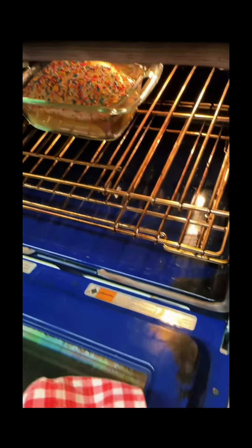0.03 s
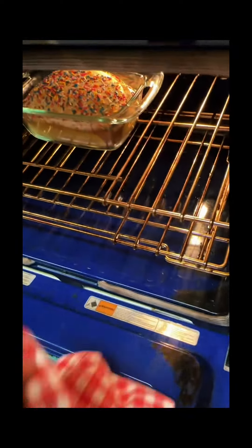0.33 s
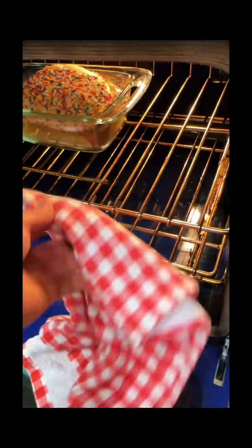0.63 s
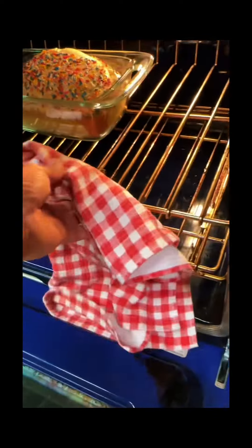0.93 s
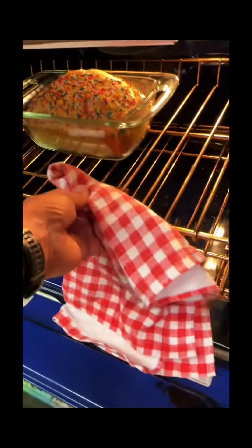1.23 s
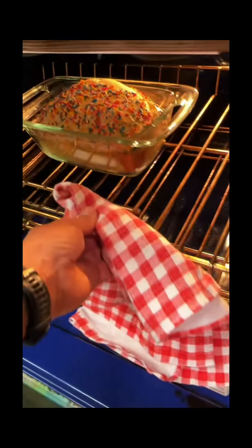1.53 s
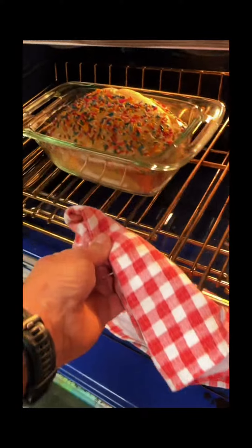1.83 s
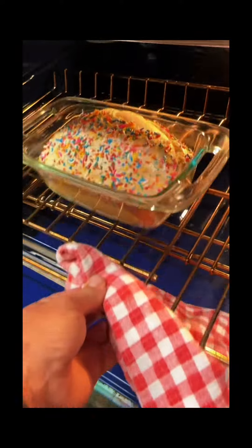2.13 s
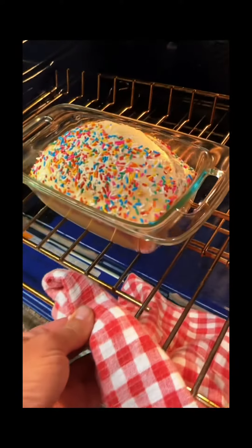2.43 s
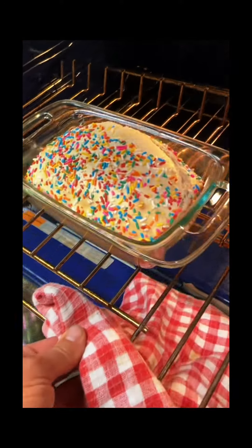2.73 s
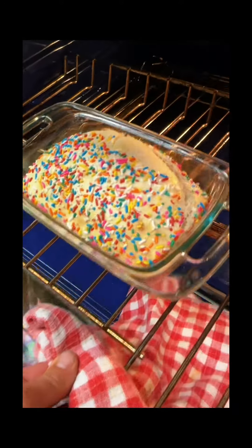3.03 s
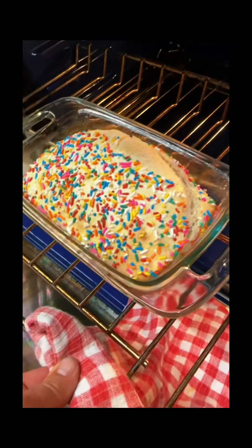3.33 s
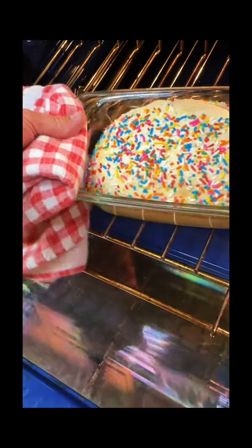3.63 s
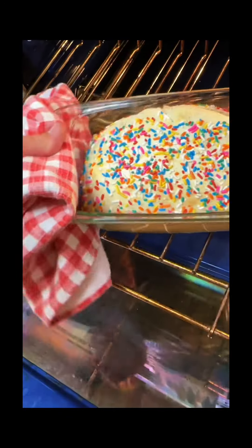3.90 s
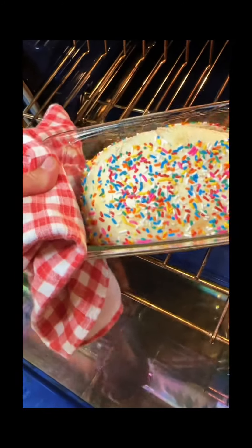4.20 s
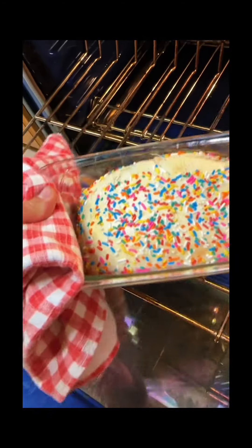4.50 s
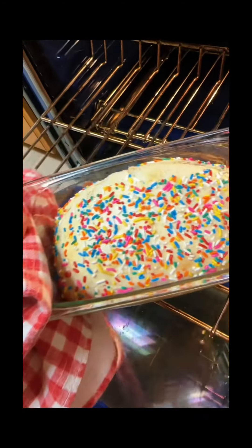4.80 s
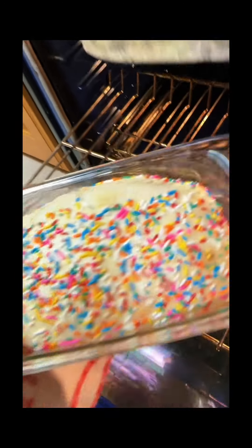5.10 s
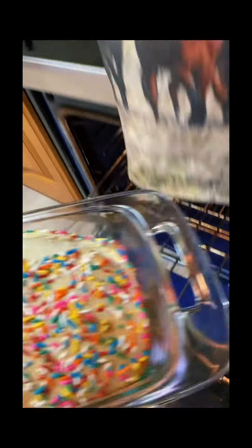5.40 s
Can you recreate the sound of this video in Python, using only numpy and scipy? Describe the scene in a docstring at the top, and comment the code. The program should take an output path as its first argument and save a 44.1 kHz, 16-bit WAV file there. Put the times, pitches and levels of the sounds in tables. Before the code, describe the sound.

Close to an open oven in a kitchen, a low electrical hum and blowing fan run throughout. After a few light scuffs, the metal rack slides out with a rolling scrape, knocks several times and hits its stop with a ringing clank and thud. A click and a tiny gap follow. Then a glass pan clinks and rattles off the rack, and faint cloth rustling accompanies it as it is carried away.

```python
"""An open oven hums and its fan blows while a wire rack with a glass loaf pan is drawn out with a cloth.
The rack grinds and rumbles along its runners, bumps over a catch, clanks against its stop and rattles
as the pan is lifted. The hum is mains harmonics; air, friction and cloth are shaped noise; knocks are
damped modes, wire buzz and wall thuds. The steel cavity and the kitchen answer.
Once the sound cuts out for a moment with a click."""
import sys
import numpy as np
from scipy import signal
from scipy.fft import rfft, irfft, next_fast_len
from scipy.io import wavfile
from scipy.ndimage import map_coordinates

SR = 44100
rng = np.random.default_rng(int(sys.argv[2]) if len(sys.argv) > 2 else 0)


def to_wav(sig):
    """Store sig (one row per channel, or 1-D mono) as 16-bit WAV at the path in sys.argv[1].

    Samples outside -1..1 are clipped; the rate is SR.
    """
    pcm = np.clip(np.atleast_2d(sig), -1, 1) * 32767
    pcm = np.round(pcm).astype(np.int16)
    wavfile.write(sys.argv[1], SR, pcm.T)  # frames by channels


N = 244789
TIME_S = np.arange(N) / SR
CUT_S = 3.387


def amp(db):
    """dB to gain."""
    return 10 ** (np.asarray(db) / 20)


def unit(x):
    """Scale to rms 1."""
    return x / np.sqrt(np.mean(x ** 2) + 1e-20)


def along(points, hz):
    """Interpolate (f/Hz, value) rows on a log axis."""
    f, values = np.transpose(points)
    return np.interp(np.log(hz + 1), np.log(f + 1), values)


def wobble(rate_hz):
    """Smooth random curve, rate_hz knots a second."""
    knots = rng.standard_normal(int(N * rate_hz / SR) + 4)
    return map_coordinates(knots, [np.arange(N) * rate_hz / SR])


def filtered(x, response):
    """Apply the gain response(hz)."""
    n = x.shape[-1]
    size = next_fast_len(n + 8192)
    return irfft(rfft(x, size) * response(np.fft.rfftfreq(size, 1 / SR)), size)[..., :n]


def add(track, at_s, sound):
    """Mix a sound into the track."""
    part = track[:, round(at_s * SR):][:, :sound.shape[-1]]
    part += sound[:, :part.shape[-1]]


def noise(spectrum, size=N):
    """Noise pair of rms 1, shaped by (f/Hz, relative level/dB) rows."""
    white = rng.standard_normal((2, size))
    return unit(filtered(white, lambda hz: amp(along(spectrum, hz))))


def dying(x, t60s):
    """Fade each band by (f/Hz, t60/s) rows."""
    hz, t, bands = signal.stft(x, SR, nperseg=256)
    decay = amp(-60 * t / along(t60s, hz)[:, None])
    return signal.istft(bands * decay, SR, nperseg=256)[1][:, :x.shape[-1]]


def resonances(peaks, hz):
    """Gain of (f/Hz, width/Hz, lift/dB) peaks on a flat response."""
    return amp(sum(db / (1 + (2 * (hz - centre) / width) ** 2) for centre, width, db in peaks))


def cavity(x, ripple_db, spacing_hz=45):
    """Standing waves in the steel box lift and sink narrow bands per channel; output rms 1."""
    knots = rng.standard_normal((2, SR // 20))

    def response(hz):
        ripple = np.array([map_coordinates(k, [hz / spacing_hz], mode="mirror") for k in knots])
        return amp(ripple_db * ripple * hz / (hz + 600))
    return unit(filtered(x, response))


def kitchen(x, low_cut_hz=220):
    """The room's diffuse tail, 10 ms late."""
    t60s = [(150, 0.094), (1000, 0.28), (6000, 0.43)]  # room decay: f/Hz, t60/s
    tail = dying(rng.standard_normal((2, SR // 2)), t60s)
    tail = np.pad(tail / np.linalg.norm(tail[0]), ((0, 0), (SR // 100, 0)))
    reverb = signal.fftconvolve(x, tail, axes=1)[:, :N]
    return filtered(reverb, lambda hz: hz ** 2 / (hz ** 2 + low_cut_hz ** 2))


def nearness_db():
    """Level change as the microphone nears and leaves the oven's mouth."""
    path = [(0, -0.5), (.6, -0.5), (1.7, 1.5), (2.75, -2), (3.3, 1), (3.8, 2), (4.3, 1), (4.95, 0),
            (5.55, -1.5)]  # t/s, level/dB
    return np.interp(TIME_S, *np.transpose(path))


def hum(hum_hz=120, lead_s=0.00016, waver_db=0.6):
    """The fan motor buzzes at twice the mains rate, left port first; its overtones waver."""
    harmonics = [(1, 1.5), (2, -22.5), (3, -22.5), (4, -41.5), (5, -44.5), (6, -49.5)]  # order, relative level/dB
    near_db = nearness_db()
    phase = 2 * np.pi * hum_hz * (TIME_S - CUT_S + np.array([[.5], [-.5]]) * lead_s)
    tone = -amp(harmonics[0][1]) * np.cos(phase)
    for order, db in harmonics[1:]:
        octave_db = 0.33 + near_db if order == 2 else 0
        tone += amp(db + octave_db + wobble(3.9)) * np.sin(order * phase + 0.34 * wobble(9.1))
    return np.sqrt(2) * amp(-29 + 0.8 * near_db + waver_db * wobble(8.3)) * tone


def fan(rumble_db=-38.5, rush_db=-58.5, hiss_db=-64, hiss_fall_db_per_s=0.66):
    """Moving air: cavity rumble, vent rush and a slowly fading hiss, all through the duct."""
    # air spectra: f/Hz, level/dB
    rumble_shape = [(20, -24.5), (40, 0), (60, 3), (100, 9.5), (145, 3), (180, -7), (230, -3), (270, -5),
                    (310, -9), (380, -12), (450, -11), (520, -29), (800, -63)]
    rush_shape = [(300, -28), (480, 1.5), (620, 0.5), (720, -0.5), (830, 0), (1100, -4.5), (1450, -7),
                  (1800, -11.5), (2250, -15.5), (2700, -34), (5000, -52.5)]
    hiss_shape = [(1200, -27.5), (2100, 7.5), (2700, 5), (3200, 2.5), (4200, 2), (4800, 0), (5400, -9),
                  (6100, -13), (7000, -32), (8000, -38)]
    duct = [(453, 18, 2), (563, 100, 5), (1090, 30, 6.5), (1330, 150, 4.5), (1380, 130, 0), (1980, 78, 2.5),
            (2150, 110, 3.5), (2750, 300, 0), (4070, 52, 6.5), (5700, 700, 2)]  # duct and cavity resonances: f/Hz, width/Hz, lift/dB
    near_db = nearness_db()
    flutter_db = .6 * wobble(10)
    rumble = amp(rumble_db + 0.87 * near_db + 0.81 * wobble(6.2)) * noise(rumble_shape)
    rush = amp(rush_db + 0.97 * near_db + flutter_db) * cavity(noise(rush_shape), ripple_db=3)
    hiss_gain = amp(hiss_db + 0.43 * near_db - hiss_fall_db_per_s * TIME_S)
    hiss = hiss_gain * cavity(noise(hiss_shape), ripple_db=2.2)
    return filtered(rumble + rush + hiss, lambda hz: resonances(duct, hz))


def draught(level_db=-47, fall_db_per_s=8, gust_db=3, gust_s=.25):
    """Air from the open door starts with a gust and dies away."""
    spectrum = [(200, -7), (350, 10.5), (450, 5.5), (530, -3.5), (630, 5), (780, -3.5), (1050, -3),
                (1250, -6.5), (1420, 0.5), (1650, -6), (1850, -13.5), (2200, -15.5), (2800, -41)]  # broad rush: f/Hz, level/dB
    gust = np.exp(-TIME_S / gust_s)
    return amp(level_db - fall_db_per_s * TIME_S + gust_db * gust) * noise(spectrum)


def cloth(start_s=3.8, rise_s=.2, level_db=-68, clump_db=4, grain_db=3.5):
    """The cloth rustles in uneven clumps while the pan is carried."""
    spectrum = [(500, -20.5), (1200, -1.5), (2200, 0.5), (3000, -4), (4000, -3.5), (5000, -10.5),
                (7000, -26.5)]  # rustle: f/Hz, level/dB
    grip = np.clip((TIME_S - start_s) / rise_s, 0, 1)
    creases = amp(clump_db * wobble(16) + grain_db * wobble(220))
    return amp(level_db) * grip * unit(creases * cavity(noise(spectrum), ripple_db=4))


def scuffs_and_tick(min_width_oct=0.14, click_s=.0018):
    """Light scuffs, and one sharp tick as the treble briefly dips: band noise, broader when briefer."""
    bursts = [(0.328, -68, 5400, 0.026), (.945, -63.5, 3830, 0.031), (1.046, -54.5, 4100, .0015),
              (1.157, -66.5, 5700, 0.01), (2.958, -68.5, 5400, 0.02), (4.046, -71, 4570, 0.019),
              (4.233, -58, 2200, 0.023), (4.649, -70, 5390, 0.028), (5.03, -63.5, 3500, 0.029)]  # t/s, level/dB, f/Hz, length/s
    track, t = np.zeros((2, N)), np.arange(SR // 4) / SR
    for at_s, db, centre_hz, length_s in bursts:
        width_oct = min_width_oct + click_s / length_s
        band = lambda hz: 1 / (1 + (np.log2((hz + 1) / centre_hz) / width_oct) ** 2)
        burst = unit(filtered(rng.standard_normal((2, len(t))), band))
        age = 2 * t / length_s
        add(track, at_s, amp(db) * age * np.exp(1 - age) * burst)
    return track


def rack_speed(start_s=1.2, rise_s=0.16, ease_s=2.28, ease_db_per_s=4.5, stop_s=3.09, halt_s=.04):
    """One pull, 0 to 1: the rack gathers speed, runs, eases off and meets the stop."""
    gather = np.clip((TIME_S - start_s) / rise_s, 0, 1)
    ease = amp(-ease_db_per_s * np.maximum(TIME_S - ease_s, 0))
    halt = np.clip(1 - (TIME_S - stop_s) / halt_s, 0, 1)
    return gather * ease * halt


def runners(friction_db=-57, rolling_db=-42):
    """The runners grind in tiny catches that make them sing; the rolling rack shakes the walls."""
    # friction and rolling spectra: f/Hz, level/dB
    friction_shape = [(300, -16), (600, 4.5), (850, 1), (1150, 7), (1700, 4.5), (2150, -2.5), (2800, -1),
                      (4000, -6), (5000, -9), (5900, -14.5), (7000, -36.5)]
    rolling_shape = [(30, -22.5), (70, 7), (140, 8.5), (230, -3.5), (340, 5.5), (450, -9.5), (800, -44)]
    singing = [(365, 70, 15), (596, 84, 10.5), (690, 100, 7), (950, 84, 3.5), (1122, 58, 9.5),
               (1983, 110, 7.5), (2200, 130, 10), (4000, 150, 6.5), (5800, 900, 5)]  # runner resonances: f/Hz, width/Hz, lift/dB
    tight_spots = [(1.553, 6, 0.079), (2.005, 13, 0.03), (3.083, 6.5, 0.061)]  # harder scraping: t/s, lift/dB, half length/s
    speed = rack_speed()
    tight_db = sum(db * np.exp(-((TIME_S - at_s) / half_s) ** 2) for at_s, db, half_s in tight_spots)
    catches = amp(2.8 * wobble(160) + .8 * wobble(25))
    grind = unit(filtered(catches * noise(friction_shape), lambda hz: resonances(singing, hz)))
    friction = speed * amp(friction_db + tight_db) * cavity(grind, ripple_db=2.2)
    rolling = speed ** 2 * amp(rolling_db + 0.47 * wobble(19)) * noise(rolling_shape)
    return friction + rolling


def ringing(modes, t, tilt_db, scatter_db=2, linewidth_at_2k_hz=22):
    """Damped modes at new strengths for every blow; loose contacts make their phases wander."""
    ring = 0
    for hz, db, t60_s in modes:
        strength = amp(db + tilt_db(hz) + scatter_db * rng.standard_normal((2, 1)))
        step_rad = np.sqrt(2 * np.pi * linewidth_at_2k_hz * hz / 2000 / SR)
        wander = step_rad * np.cumsum(rng.standard_normal((2, len(t))), axis=1)
        phase = 2 * np.pi * (hz * t + rng.random((2, 1))) + wander
        ring = ring + strength * amp(-60 * t / t60_s) * np.sin(phase)
    return ring


def clank(modes, t, tilt_db_per_oct, attack_s, ring_db=-8.5, buzz_db=-2):
    """One contact rings the struck part and sets the wires buzzing."""
    buzz_shape = [(60, 2), (150, 6), (330, 8.5), (500, 3), (800, 2), (1300, -2.5), (2100, -5.5),
                  (3200, -10.5), (4300, -8), (5700, -12), (6600, -28), (7400, -36.5)]  # wire spectrum: f/Hz, level/dB
    buzz_t60s = [(200, 0.32), (1000, 0.23), (3000, 0.13), (6500, 0.062)]  # wire decay: f/Hz, t60/s
    tilt_db = lambda hz: tilt_db_per_oct * np.log2(np.clip(hz, 1000, 6000) / 1500)
    wires = cavity(noise(buzz_shape, size=len(t)), ripple_db=4.5)
    buzz = dying(filtered(wires, lambda hz: amp(tilt_db(hz))), buzz_t60s)
    attack = 1 - np.exp(-t / attack_s)
    return (amp(ring_db) * ringing(modes, t, tilt_db) + amp(buzz_db) * buzz) * attack


def knocks(contacts=5, gap_growth=1.7, loss_power=1.83, dulling_per_oct=.4):
    """Each knock is a first touch, then ever slower, weaker, duller rebounds that thump the walls."""
    # modes of steel catch, wire rack, glass pan on the wires, oven walls: f/Hz, level/dB, t60/s
    catch_modes = [(214, -3.5, 0.46), (335.3, 10, 0.57), (601, 2, 0.27), (753, -3, 0.41),
                   (1160, -16.5, .28), (1670, -15, 0.27), (2045, -1.5, 0.069), (2200, -5, 0.21),
                   (2650, -12, 0.24), (3530, -13, 0.24), (3830, -16.5, .3), (5790, -14.5, 0.18)]
    rack_modes = [(230, 0.5, 0.5), (303.3, -2, 1), (540, -7.5, 0.39), (600, 2.5, 0.23), (732, -13.5, 0.41),
                  (880, -19, .3), (1210, -4.5, 0.21), (1325, -13.5, 0.39), (1614, -4.5, 0.25),
                  (1710, -11, 0.32), (2117, -12.5, 0.23), (2130, -6.5, 0.11), (2333, -8, .3),
                  (2770, -19, 0.19), (2790, -16.5, .25), (2900, -15, 0.2), (4040, -17.5, .3),
                  (4360, -22, .3), (5500, -23.5, 0.1), (5770, -32, 0.28), (6000, -31, 0.25)]
    pan_modes = [(264, -1.5, .45), (324, 3.5, 0.56), (435, 1.5, 0.98), (622, -1, .35), (688, 7, 0.19),
                 (876, -4, 0.34), (1175, -4, 0.25), (1370, -10, 0.64), (2084, -4, .25), (3140, -14, 0.35),
                 (3320, -16, 0.24), (3500, -11.5, 0.37), (4240, -12, .22), (4400, -13, 0.35)]
    wall_modes = [(97.6, -1, 0.15), (127.9, 7, 0.068), (184, -9.5, 0.2)]
    # t/s, clank/dB, thud/dB, tilt/(dB/oct), first gap/s, first rebound loss/dB, part
    blows = [(1.759, -49, -26, -4, .004, 11, "catch"), (2.116, -36, -18.5, 4, .005, 4, "catch"),
             (2.18, -43, -41, 1, .006, 5.5, "catch"), (2.217, -53, -29.5, 0.5, .005, 7.5, "catch"),
             (3.089, -26.5, -15, 3.5, .008, 1.25, "rack"), (3.544, -32.5, -39.5, 0.5, 0.0093, 0.74, "pan")]
    # modes, time for the weight to bear on the walls/s, first touch gain/dB
    parts = {"catch": (catch_modes, .0022, 2), "rack": (rack_modes, .0087, -3),
             "pan": (pan_modes, .0056, -4)}
    track, t = np.zeros((2, N)), np.arange(SR // 2) / SR
    walls = sum(amp(db - 60 * t / t60_s) * np.sin(2 * np.pi * hz * t) for hz, db, t60_s in wall_modes)
    for at_s, clank_db, thud_db, tilt_db_per_oct, gap_s, loss_db, part in blows:
        modes, push_s, first_db = parts[part]
        thud = walls * (1 - np.exp(-t / push_s))
        lost_db = loss_db * np.arange(contacts) ** loss_power
        for k in range(contacts):
            tilt = tilt_db_per_oct - dulling_per_oct * lost_db[k]
            ring = amp(clank_db - lost_db[k]) * clank(modes, t, tilt, attack_s=push_s / 4)
            if k == 0:
                add(track, at_s, amp(first_db) * ring)
            else:
                add(track, at_s, ring + amp(thud_db - lost_db[k - 1]) * thud)
            at_s += gap_s * gap_growth ** k
    return track


def treble_dip(x, start_s=1.03, end_s=1.087, dip_db=-7, above_hz=1300):
    """The treble sinks briefly."""
    depth = np.clip(np.minimum(TIME_S - start_s, end_s - TIME_S) / .005, 0, 1)
    treble = filtered(x, lambda hz: 1 - 1 / (1 + (hz / above_hz) ** 6))
    return x - depth * (1 - amp(dip_db)) * treble


def bass_swell(x, below_hz=300, start_db=-15, swell_s=0.11):
    """The bass swells in at the start."""
    gain = amp(start_db * np.clip(1 - TIME_S / swell_s, 0, 1))
    bass = filtered(x, lambda hz: 1 / (1 + (hz / below_hz) ** 4))
    return x - (1 - gain) * bass


def ports(pair):
    """Two microphone ports: unrelated signals become left and right, alike in bass, apart in treble."""
    width = [(80, -29), (190, -19), (300, -16), (450, -10), (600, -5.5), (800, -2), (1300, -1), (2000, 1),
             (2600, 4), (3500, -2), (4400, 2), (5200, 7), (6000, -1), (6600, -3)]  # f/Hz, side over mid/dB
    quadrature = [(130, .9), (300, .4), (550, -0.15), (1000, 0.014), (1700, 0.29), (2600, 1), (3300, 0.17),
                  (4200, .2), (5500, -0.49), (6200, .5), (7000, .2)]  # f/Hz, share of the side a quarter cycle ahead
    balance = [(250, -4.5), (550, 1.2), (1100, 0), (2200, 1.5), (4000, 0.1), (6100, -.7)]  # f/Hz, left over right/dB
    lead = lambda hz: np.clip(along(quadrature, hz), -1, 1)
    coherent = filtered(pair[0], lambda hz: 1j * lead(hz))
    diffuse = filtered(pair[1], lambda hz: np.sqrt(1 - lead(hz) ** 2))
    angle = lambda hz: np.arctan(amp(along(width, hz)))
    mid = filtered(pair[0], lambda hz: np.cos(angle(hz)))
    side = filtered(coherent + diffuse, lambda hz: np.sin(angle(hz)))
    lean = lambda hz: amp(along(balance, hz) * np.array([[.5], [-.5]]))
    return filtered(np.array([mid + side, mid - side]), lean)


def mono_bass(x, start_hz=680, sink_hz_per_s=75):
    """Until the cut the bass is mono below a slowly sinking edge."""
    hz, t, bands = signal.stft((x[0] - x[1]) / 2, SR, nperseg=1024)
    edge_hz = np.maximum(start_hz - sink_hz_per_s * t, 100)
    slope = (hz[:, None] / edge_hz) ** 4
    side_gain = np.where(t < CUT_S, slope / (1 + slope), 1)
    side = signal.istft(bands * side_gain, SR, nperseg=1024)[1][:N]
    return x.mean(axis=0) + np.array([side, -side])


def scene(room_db=-10.5):
    """Rack, pan and cloth in the kitchen, over the running oven."""
    foreground = knocks() + scuffs_and_tick() + cloth()
    air = treble_dip(fan() + draught())
    room = amp(room_db) * kitchen(foreground)
    return bass_swell(ports(foreground + room + runners() + air) + hum())


def record(dry, low_hz=30, top_hz=6800, hiss_db=-95.5, mute_s=.005, return_s=.019):
    """No deep bass, a dull top, faint whine and hiss; the sound cuts with a click and swells back."""
    whine_tones = [(9480, -92), (9720, -93)]  # electrical whine: f/Hz, peak level/dB
    fades = np.clip(np.minimum(TIME_S, TIME_S[-1] - TIME_S) / .008, 0, 1)
    passband = lambda hz: hz ** 2 / (hz ** 2 + low_hz ** 2) / np.sqrt(1 + (hz / top_hz) ** 50)
    dull = filtered(mono_bass(dry) * fades, passband)
    whine = sum(amp(db) * np.sin(2 * np.pi * hz * TIME_S) for hz, db in whine_tones)
    hiss = amp(hiss_db) * noise([(7000, -1), (9000, -2.5), (10000, -10.5), (14000, -25), (15000, -42)])[0]
    cut = np.clip((CUT_S - TIME_S) / .000022, 0, 1)  # one-sample drop: the click
    recovery = np.clip((TIME_S - CUT_S - mute_s) / return_s, 0, 1)
    lowpass = signal.butter(12, 15500, fs=SR, output="sos")
    return signal.sosfilt(lowpass, (dull + whine + hiss) * (cut + recovery))


dry = scene()
out = record(dry)
to_wav(out)
```